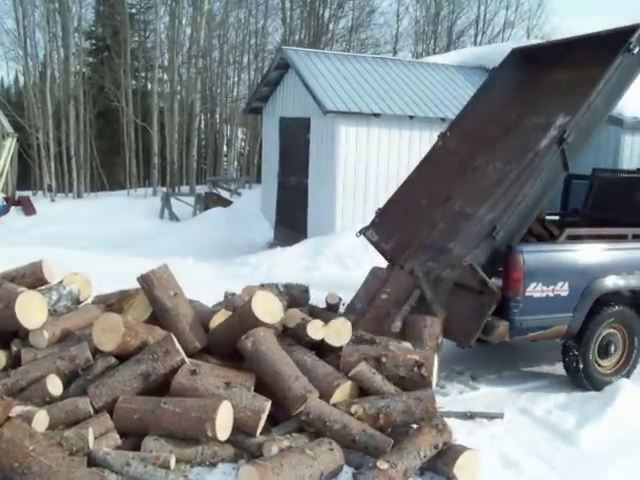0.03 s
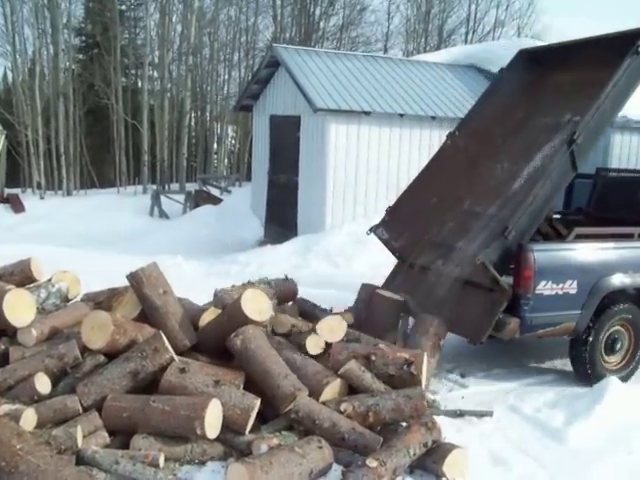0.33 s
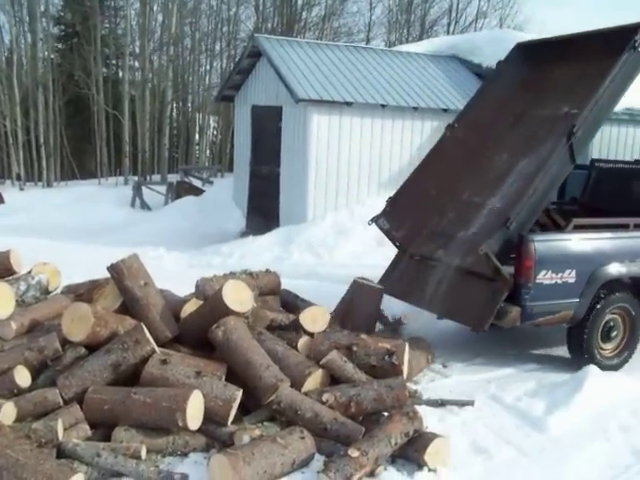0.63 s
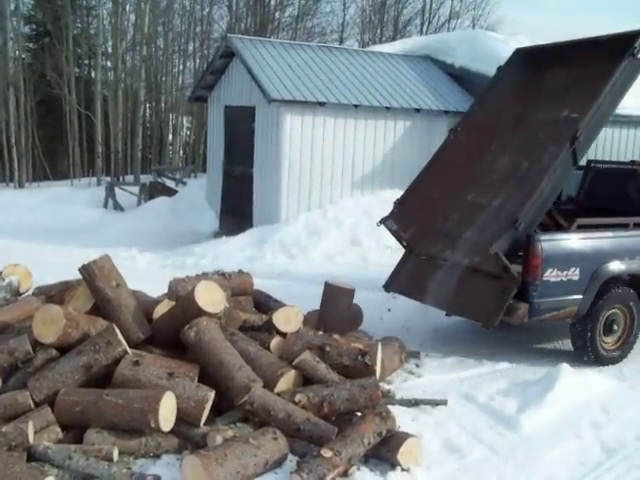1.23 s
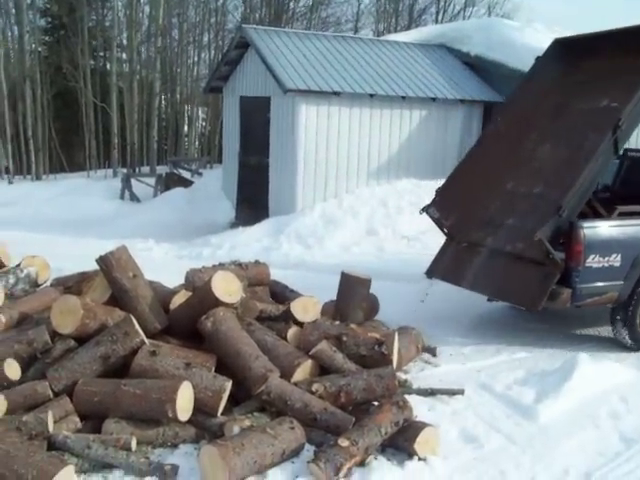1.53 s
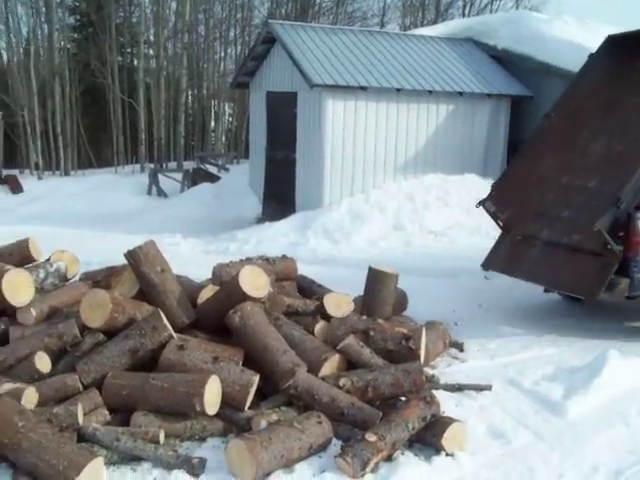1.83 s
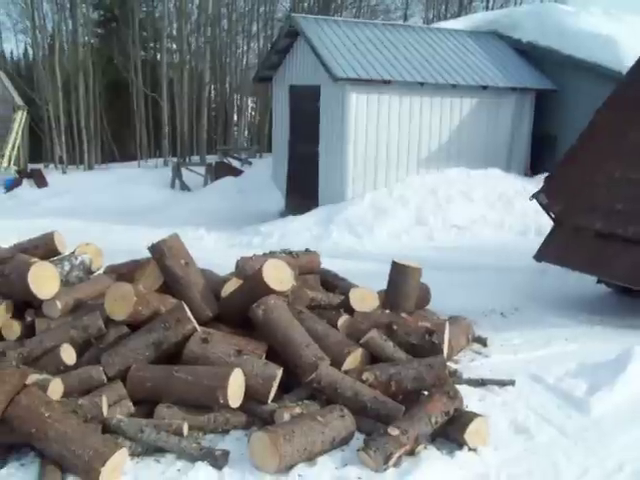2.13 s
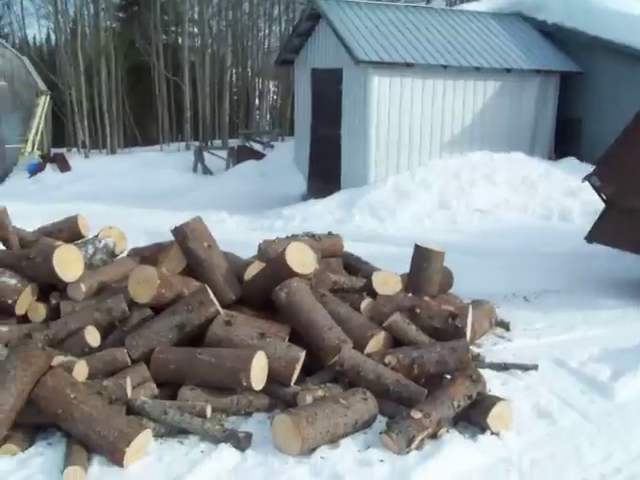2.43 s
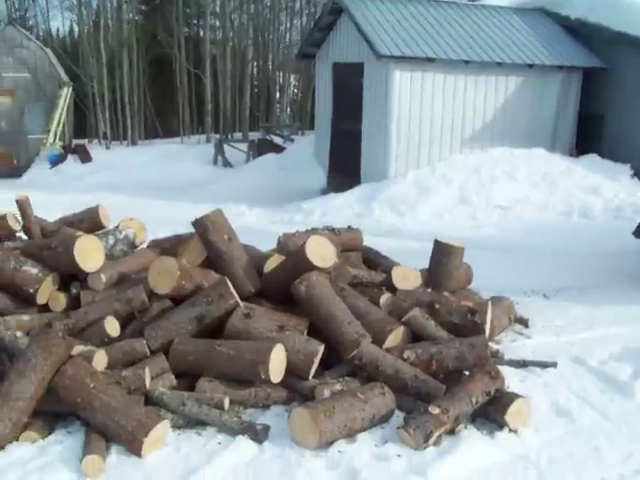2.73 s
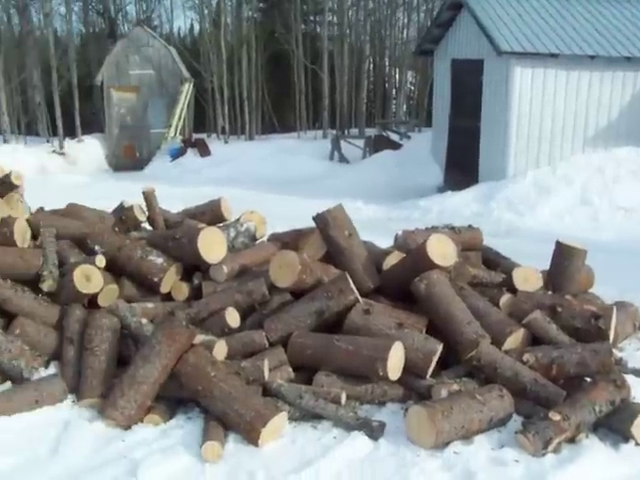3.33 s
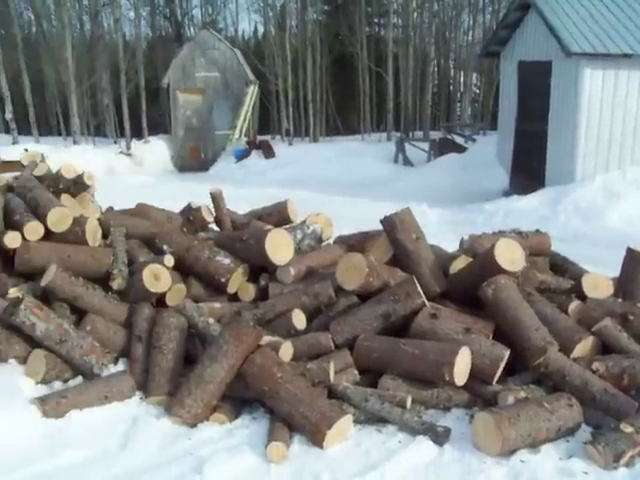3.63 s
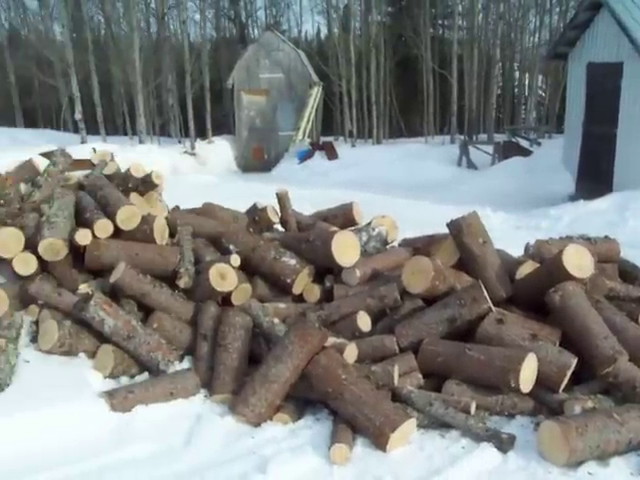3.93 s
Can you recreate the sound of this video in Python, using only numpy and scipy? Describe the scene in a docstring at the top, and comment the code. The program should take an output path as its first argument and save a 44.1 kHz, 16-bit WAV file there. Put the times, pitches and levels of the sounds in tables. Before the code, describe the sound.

Logs scrape, boom and clang down a pickup's raised steel bed and knock onto a woodpile. The running engine then dips and picks up as the truck pulls away, tyres crunching and squeaking on snow, heard outdoors from nearby.

```python
"""Logs scrape down the raised steel bed of a pickup, which booms and clangs as they tumble,
and knock onto a woodpile in a snowy yard. Friction and impacts excite the modes of steel and wood.
The eight-cylinder engine, a series of harmonics of its firing cycle, sags under load and picks up.
The truck pulls away with a thin whine, over snow that crunches as it breaks and squeaks as it slips."""
import sys
import numpy as np
from scipy import signal
from scipy.fft import rfft, irfft
from scipy.io import wavfile

SR = 44100
rng = np.random.default_rng(int(sys.argv[2]) if len(sys.argv) > 2 else 0)


def to_wav(s):
    """Save 16-bit WAV."""
    ch = np.atleast_2d(s).T  # columns
    pcm = np.round(np.clip(ch, -1, 1) * 32767)  # PCM
    wavfile.write(sys.argv[1], SR, pcm.astype(np.int16))


N = 176400
CUTOFF_HZ = 8500  # upper limit of the knocks and of the whole sound


def from_db(db):
    """Amplitude ratio of a level in decibels."""
    return 10 ** (np.asarray(db) / 20)


def rms_one(x):
    """Normalisation to unit mean power."""
    return x / np.sqrt(np.mean(x ** 2) + 1e-20)


def seconds():
    """The time of each sample."""
    return np.arange(N) / SR


def in_time(rows):
    """Linear interpolation over time: one curve for each column after the first."""
    times, *columns = np.transpose(rows)
    return [np.interp(seconds(), times, column) for column in columns]


def per_bin(points):
    """Interpolation over log frequency, read at every spectral bin."""
    hz, value = np.transpose(points)
    return np.interp(np.log(np.arange(N // 2 + 1) * SR / N + 1), np.log(hz), value)


def drift(per_s):
    """Random modulation: straight lines between Gaussian values of spread 1."""
    knots = rng.standard_normal(1000)
    return np.interp(seconds() * per_s, np.arange(len(knots)), knots)


def ring(x, hz, t60):
    """A damped resonator: one mode, driven by x."""
    radius, angle = from_db(-60 / (t60 * SR)), 2 * np.pi * hz / SR
    return signal.lfilter([0, np.sin(angle)], [1, -2 * radius * np.cos(angle), radius ** 2], x + 1e-18)


def filtered(x, order, hz, kind="band"):
    """A filter with a maximally flat passband."""
    return signal.sosfilt(signal.butter(order, hz, kind, fs=SR, output="sos"), x + 1e-18)


def add(out, start_s, x):
    """Superposition of x from the given time."""
    i = int(start_s * SR)
    out[i:i + len(x)] += x[:N - i]


def sized(x, db, window_s):
    """Equal energy: a hit is scaled to match a steady sound of that level lasting one window."""
    return x * from_db(db) * np.sqrt(window_s * SR / np.sum(x ** 2))


def burst(decay_s, rise, size):
    """Rough contact: a spray of tiny impacts that builds over the share `rise` of its decay time."""
    age = np.arange(size) / (decay_s * SR)
    return rng.standard_normal(size) * np.minimum(age / rise, 1) * np.exp(-age)


def grains(per_s, spread_db):
    """Shot noise: two streams of random clicks of uneven size."""
    sizes = from_db(spread_db * np.minimum(rng.exponential(1, (2, N)), 5))
    return sizes * rng.choice([-1, 1], (2, N)) * (rng.random((2, N)) < per_s / SR)


# Likeness of left and right: frequency_hz, correlation
COHERENCE = [(200, .99), (700, 0.93), (1400, 0.47), (2800, 0.28), (7000, 0.083)]
def coloured(pair, spectrum):
    """Partial coherence: two independent streams mix into a spectrally shaped stereo pair of rms 1."""
    mid, side = rfft(pair) * from_db(per_bin(spectrum))
    alike = per_bin(COHERENCE)
    return rms_one(irfft(np.sqrt(1 + alike) * mid + np.sqrt(1 - alike) * side * [[1], [-1]], N))


# Bark sliding on steel: time_s, level_db
SCRAPE_LEVEL = [(0, -15.5), (.08, -19.5), (.125, -23), (.165, -13.5), (.2, -17.5), (.26, -22), (.32, -25.5),
                (.38, -21.5), (.42, -25.5), (.445, -23), (.465, -21), (.49, -16), (.55, -24.5), (.62, -23),
                (.68, -29), (.9, -35.5), (1.2, -39.5), (1.5, -74)]
# Its spectrum: frequency_hz, density_db
SCRAPE_SPECTRUM = [(60, -1.5), (200, 15.5), (300, 9), (500, 9), (900, 4.5), (1300, 3), (2000, 0.5),
                   (3000, 0.5), (4600, -4), (5400, -6), (6800, -2), (7600, -10)]
def bark_scrape(patchy_db=2.5):
    """Stick-slip friction: bark catches and slips on the steel in a dense train of clicks."""
    slips = coloured(grains(per_s=9000, spread_db=4), SCRAPE_SPECTRUM)
    return slips * from_db(in_time(SCRAPE_LEVEL)[0] + patchy_db * drift(120))


# Booming modes of the bed's floor: pitch_hz, level_db, t60_s
FLOOR_MODES = [(74.4, -8, 0.059), (97, -11, 0.17), (116.6, -5.5, 0.85), (130.4, -14, 0.27), (153, -7, 0.77),
               (171.8, -6.5, 0.19), (173.4, -14.5, 0.33), (184.4, 0, 0.53), (205.7, -3.5, 1),
               (238, -23.5, 0.37), (252, -25, 0.16)]
# Clanging modes of its panels: pitch_hz, level_db, t60_s
PANEL_MODES = [(367, -11.5, .5), (434.3, -11.5, 1), (491.4, 0, 0.31), (547.3, 0.5, 0.48), (578, -2.5, 0.2),
               (615, -0.5, 0.12), (680, 1, 0.098), (723, -2, 0.28), (817, 1.5, 0.2), (903.5, 0.5, 0.053),
               (900, -7, 0.11), (1136, -8, 0.27)]
def bed_rumble(re_scrape_db=-8, panels_db=-7):
    """Forced vibration: the sliding load keeps the floor and panels ringing between the blows."""
    drag = rng.standard_normal(N) * from_db(in_time(SCRAPE_LEVEL)[0])
    floor, panels = (rms_one(sum(from_db(db) * rms_one(ring(drag, hz, t60)) for hz, db, t60 in modes))
                     for modes in (FLOOR_MODES, PANEL_MODES))
    return np.std(drag) * from_db(re_scrape_db) * (floor + from_db(panels_db) * panels)


# Logs striking the bed: start_s, boom_db, clang_db, centre_hz, contact_s
BLOWS = [(0.004, -17, -22, 600, 0.045), (0.061, -19.5, -23, 680, 0.062), (0.132, -18, -19, 490, 0.024),
         (0.17, -27.5, -27.5, 810, 0.027), (0.261, -28.5, -35.5, 500, 0.11), (.358, -19, -17, 635, 0.019),
         (0.407, -17.5, -42.5, 500, 0.0047), (.475, -34, -15.5, 795, 0.019), (0.511, -23, -18.5, 680, 0.02),
         (0.54, -21.5, -24.5, 480, 0.0097), (.592, -20, -26.5, 517, 0.031), (.685, -21, -41, 520, 0.053),
         (0.987, -29, -41, 623, 0.0053), (3.795, -62, -33, 616, 0.006)]
def bed_blows(window_s=0.028, vary_db=3, thud_re_clang_db=-22.5, focus_db_per_octave=18):
    """Impact excitation: each log thuds, booms the floor and clangs the panel modes near its centre."""
    out = np.zeros(N)
    for start_s, boom_db, clang_db, centre_hz, contact_s in BLOWS:
        contact = burst(contact_s, rise=0.23, size=40000)
        thud = filtered(contact, order=2, hz=(450, 570))
        add(out, start_s, sized(thud, clang_db + thud_re_clang_db, window_s))
        panels = [(hz, db - focus_db_per_octave * abs(np.log2(hz / centre_hz)), t60)
                  for hz, db, t60 in PANEL_MODES]
        for modes, level_db in ((FLOOR_MODES, boom_db), (panels, clang_db)):
            body = sum(from_db(db + vary_db * rng.normal()) * rms_one(ring(contact, hz, t60))
                       for hz, db, t60 in modes)
            add(out, start_s, sized(body, level_db, window_s))
    return out


# Engine speed: time_s, firing_rate_hz
FIRING_RATE = [(0, 42.5), (.9, 42), (1.04, 37.8), (1.27, 34), (1.5, 36), (1.7, 37.8), (1.77, 39.6),
               (1.95, 43.1), (2.1, 43.5), (2.47, 43.5), (2.86, 47), (3.1, 48.4), (3.3, 47.4), (3.5, 47.2),
               (3.7, 48.3), (4, 50)]
# Gain common to all exhaust harmonics: time_s, gain_db
EXHAUST_GAIN = [(0, -30), (.9, -31), (1.3, -36), (1.8, -30.5), (2.1, -30), (2.5, -30.5), (2.7, -28.5),
                (3.1, -28.5), (3.5, -28), (4, -28.5)]
# Exhaust harmonics: multiple of the eight-firing cycle
ORDERS = [7, 8, 9, 10, 11, 12, 13, 14, 15, 16, 17, 19, 20, 24, 27, 32]
# Each harmonic at low speed: level_db
SLOW_ORDER_DB = [-6, -2.5, -5, -14, 4.5, -4, 0.5, -14.5, -5, -3, -23.5, -7.5, -15, -15, -9.5, -11]
# Each harmonic at high speed: level_db
FAST_ORDER_DB = [-14, 2.5, -10, -21, -7, -18, -18, -20, -21, -13, -19, -26, -29, -19, -29, -28]
# Whirr of fan and valve gear: time_s, level_db
WHIRR_ENVELOPE = [(0, -30.5), (1, -30), (1.6, -31.5), (2.3, -33.5), (3, -33), (3.6, -32), (4, -32)]
# Its spectrum: frequency_hz, density_db
WHIRR_SPECTRUM = [(25, -2.5), (60, 13), (120, 3.5), (230, 3), (380, -3.5), (500, 1), (650, 1.5), (860, 2.5),
                  (1100, -2.5), (1500, 0), (1950, -1.5), (2300, -9.5), (3200, -7), (4800, -15),
                  (7000, -18.5)]
def engine(slow_hz=35, fast_hz=44.2, waver_db=0.3, spread_rad=0.9, throb=0.18):
    """Periodic excitation: firings pulse exhaust and whirr; uneven timing adds burbling harmonics."""
    rate, gain_db = in_time(FIRING_RATE)[0], in_time(EXHAUST_GAIN)[0]
    firing_phase = 2 * np.pi * np.cumsum(rate) / SR
    fast_share = np.clip((rate - slow_hz) / (fast_hz - slow_hz), 0, 1)
    exhaust = np.zeros(N)
    for order, slow_db, fast_db in zip(ORDERS, SLOW_ORDER_DB, FAST_ORDER_DB):
        # Staggered phases keep the burbling harmonics from thumping together.
        offset = np.pi / 4 + spread_rad * (order - 8) ** 2 if order % 8 else 0
        db = gain_db + slow_db + fast_share * (fast_db - slow_db) + waver_db * drift(4.2)
        exhaust += from_db(db) * np.cos(order * firing_phase / 8 + offset)
    whirr = coloured(rng.standard_normal((2, N)), WHIRR_SPECTRUM) * from_db(in_time(WHIRR_ENVELOPE)[0])
    return np.sqrt(2) * exhaust + whirr * (1 + throb * np.cos(firing_phase))


CHIP_BAND_HZ = (2900, 6500)
def crust_ticks(level_db=-54):
    """Brittle fracture: snow crust and bark chips break at random times in faint ticks."""
    breaks = grains(per_s=41, spread_db=4)[0]
    return from_db(level_db) * rms_one(filtered(breaks, order=3, hz=CHIP_BAND_HZ))


KNOCK_WINDOW_S, KNOCK_RISE = 0.023, 0.069
# Modes of a hollow-sounding and a hard-clacking log: pitch_ratio, level_db, t60_s
LOG_MODES = {"hollow": [(1, 6.5, 0.04), (1.265, -3.5, 0.04), (1.92, -2, 0.027), (2.36, -3.5, 0.021),
             (3, -9, 0.035), (3.39, -7.5, 0.03), (4.15, -18, 0.025)], "hard": [(1, 3.5, 0.045),
             (1.43, -9.5, 0.037), (1.7, -7, 0.036), (2.27, 0.5, 0.022), (2.56, 8.5, 0.028),
             (3.05, 4, 0.015), (3.4, 4.5, 0.022), (3.85, 4.5, 0.014), (4.55, 4.5, 0.014),
             (5.2, 10.5, 0.011), (6.1, 11.5, 0.026)]}
# Log striking log: start_s, level_db, kind, lowest_mode_hz, tilt_db_per_octave, crush_s
LOG_KNOCKS = [(.231, -20, "hard", 1435, 15, 0.0084), (0.3401, -17.5, "hard", 1261, -4.5, 0.003),
              (0.436, -23, "hard", 1350, 3, 0.0078), (0.476, -16, "hard", 1326, -1.5, 0.011),
              (0.6201, -16, "hollow", 1346, -0.5, 0.003), (0.673, -32, "hollow", 1380, -0.5, 0.0045),
              (.804, -29, "hollow", 1114, 1, 0.0041), (.867, -27, "hollow", 1580, -1, 0.0015),
              (0.955, -28, "hard", 1140, -14.5, 0.0036), (0.989, -33.5, "hollow", 1163, -11, 0.0049),
              (1.0279, -15, "hard", 1205, 1, 0.0024), (1.169, -23.5, "hard", 1280, -6, 0.0084),
              (3.797, -33, "hard", 451, -2.5, 0.0063)]
def log_knocks(crack_db=-5):
    """Damped free vibration: each knock crushes bark and rings the short-lived modes of the log."""
    out = np.zeros(N)
    for start_s, level_db, kind, lowest_hz, tilt_db, crush_s in LOG_KNOCKS:
        contact = burst(crush_s, KNOCK_RISE, size=6000)
        wood = sum(from_db(db + tilt_db * np.log2(ratio)) * rms_one(ring(contact, lowest_hz * ratio, t60))
                   for ratio, db, t60 in LOG_MODES[kind])
        band_hz = (0.95 * lowest_hz, CUTOFF_HZ)  # a log radiates little below its lowest mode
        tone = rms_one(filtered(wood, order=3, hz=band_hz))
        crack = from_db(crack_db) * rms_one(filtered(contact, order=3, hz=band_hz))
        add(out, start_s, sized(tone + crack, level_db, KNOCK_WINDOW_S))
    return out


# Bark and snow crust snapping: start_s, level_db
CHIP_SNAPS = [(0.348, -26.5), (0.915, -33.5), (1.398, -37), (1.9826, -40), (2.0255, -31.5), (2.103, -41.5),
              (2.86, -47.5), (2.955, -45.5), (3.016, -45), (3.24, -42.5), (3.7204, -43.5), (3.9757, -45)]
def chip_snaps(decay_s=0.0016):
    """Fracture transients: a breaking chip is all treble and does not ring."""
    out = np.zeros(N)
    for start_s, level_db in CHIP_SNAPS:
        snap = filtered(burst(decay_s, KNOCK_RISE, size=1500), order=3, hz=CHIP_BAND_HZ)
        add(out, start_s, sized(snap, level_db, KNOCK_WINDOW_S))
    return out


# Tyres crushing snow: time_s, level_db
CRUNCH_ENVELOPE = [(0, -49.5), (.7, -37.5), (1.1, -33), (1.4, -30), (1.7, -38.5), (2.1, -40.5),
                   (2.6, -52.5), (3.3, -51), (4, -53)]
# Spectrum of the crunch: frequency_hz, density_db
CRUNCH_SPECTRUM = [(300, -17.5), (900, -15.5), (1500, -13), (2800, 5.5), (4500, -0.5), (7000, 0.5)]
def snow_crunch(patchy_db=2):
    """Granular fracture: snow grains break in clumps under the tread."""
    breaks = coloured(grains(per_s=2900, spread_db=4), CRUNCH_SPECTRUM)
    return breaks * from_db(in_time(CRUNCH_ENVELOPE)[0] + patchy_db * drift(45.12))


# Packed snow squeaking under the tread: time_s, level_db
SQUEAK_ENVELOPE = [(0, -77), (.9, -44), (1.25, -38), (1.6, -36.5), (2.05, -36.5), (2.5, -37), (2.75, -42.5),
                   (3, -34), (3.3, -42.5), (3.7, -37), (4, -60)]
# Its resonances: pitch_hz, level_db, t60_s
SQUEAK_MODES = [(1407, -1, 0.038), (1578, -1, 0.016), (1810, -5, 0.015), (1920, -2.5, 0.04),
                (2586, 1, 0.0056)]
def snow_squeak(bend_share=0.025, bends_per_s=7):
    """Stick-slip excitation: packed snow catches and slips, ringing resonances that waver in pitch."""
    squeak = sum(from_db(db) * rms_one(ring(grains(per_s=990, spread_db=6.5)[0], hz, t60))
                 for hz, db, t60 in SQUEAK_MODES)
    read_position = np.cumsum(1 + bend_share * drift(bends_per_s)) % N
    bent = np.interp(read_position, np.arange(N), squeak)
    return rms_one(bent) * from_db(in_time(SQUEAK_ENVELOPE)[0])


def wavering(hz, pitch_share=0.035, flutter_db=4.5, per_s=80):
    """Random frequency and amplitude modulation of a tone, at rms 1."""
    phase = 2 * np.pi * np.cumsum(hz * (1 + pitch_share * drift(per_s))) / SR
    return rms_one(np.sin(phase) * from_db(flutter_db * drift(per_s)))


# Whine as the truck moves off: time_s, pitch_hz, level_db
WHINE_CONTOUR = [(1.15, 1650, -60), (1.3, 1610, -45), (1.55, 1470, -42), (1.7, 1440, -41),
                 (1.82, 1440, -47), (1.96, 1540, -41), (2.12, 1370, -42), (2.22, 1500, -46),
                 (2.38, 1420, -40.5), (2.55, 1410, -45), (2.75, 1350, -44), (2.95, 1500, -41),
                 (3.2, 1480, -50), (3.47, 1420, -47), (3.7, 1450, -60)]
def whine():
    """A modulated tone: one thin, sustained line wanders in pitch and strength."""
    hz, db = in_time(WHINE_CONTOUR)
    return from_db(db) * wavering(hz)


# Chirps of the tread on snow: peak_s, level_db, pitch_hz, half_length_s
TREAD_CHIRPS = [(1.425, -35.5, 2010, .024), (1.845, -40, 1980, .022)]
def tread_chirps():
    """Tone pulses: each chirp of the tread is a wavering tone under a Gaussian envelope."""
    return sum(from_db(db) * np.exp(-((seconds() - peak_s) / half_s) ** 2) * wavering(hz)
               for peak_s, db, hz, half_s in TREAD_CHIRPS)


def yard(x, scatter_db=-12, t60_s=0.16):
    """Diffuse reflection: pile, truck and shed add a faint tail, different in each ear."""
    tails = rng.standard_normal((2, SR // 2)) * from_db(-60 * seconds()[:SR // 2] / t60_s)
    tails /= np.sqrt(np.sum(tails ** 2, axis=1, keepdims=True))
    return x + from_db(scatter_db) * signal.fftconvolve(x[None], tails, axes=1)[:, :N]


# Lag of the right side behind the left: time_s, delay_ms
RIGHT_DELAY = [(0, 0.028), (1.3, 0.059), (1.8, 0.17), (2.2, 0.19), (4, 0.24)]
# Level difference between the sides: frequency_hz, left_over_right_db
BALANCE = [(60, -.8), (700, -1), (1150, -2), (1450, 1.34), (2000, 1.85), (2800, 5), (3600, 8), (4300, 5.47),
           (5200, 9.3), (6400, 4.56), (8000, 4.55)]
def scene():
    """Interaural time and level differences: all sources reach the left slightly earlier and brighter."""
    truck = engine() + snow_crunch() + snow_squeak() + whine() + tread_chirps()
    unloading = bark_scrape() + bed_rumble() + bed_blows()
    left, right = truck + unloading + yard(log_knocks() + chip_snaps() + crust_ticks())
    right = np.interp(seconds() - in_time(RIGHT_DELAY)[0] / 1000, seconds(), right)
    side_gains = from_db(per_bin(BALANCE) * [[0.5], [-0.5]])
    return irfft(rfft(np.array([left, right])) * side_gains, N)


# Dips in the microphone's response: centre_hz, quality_factor, depth_share
MICROPHONE_DIPS = [(301.7, 2.27, 0.79), (966, 21, 0.9)]
def record(dry, ceiling=0.85):
    """Band limiting and saturation: the microphone has two dips, trims both ends and rounds peaks."""
    for hz, q, depth in MICROPHONE_DIPS:
        notched = signal.lfilter(*signal.iirnotch(hz, q, fs=SR), dry)
        dry = dry + depth * (notched - dry)
    dry = filtered(dry, order=4, hz=32, kind="high")
    dry = filtered(dry, order=14, hz=7150, kind="low")
    rounded = dry / (1 + (dry / ceiling) ** 6) ** (1 / 6)
    return signal.sosfiltfilt(signal.cheby1(8, 0.1, CUTOFF_HZ, fs=SR, output="sos"), rounded)


dry = scene()
out = record(dry)
to_wav(out)
```